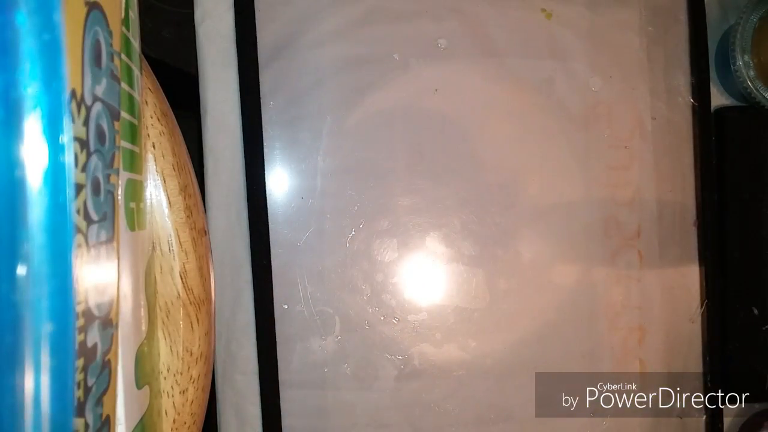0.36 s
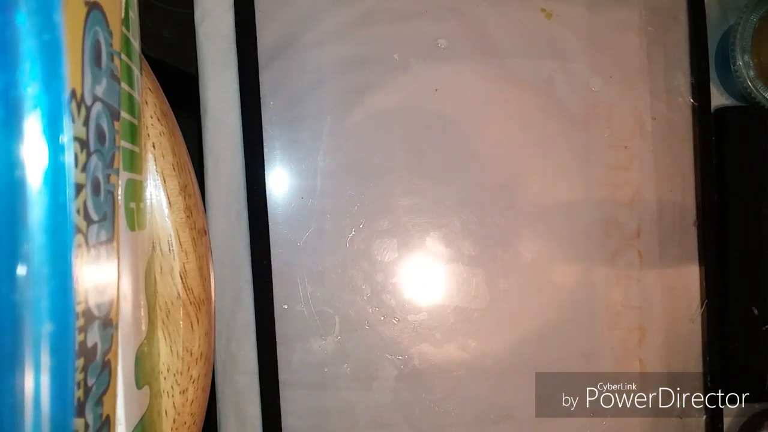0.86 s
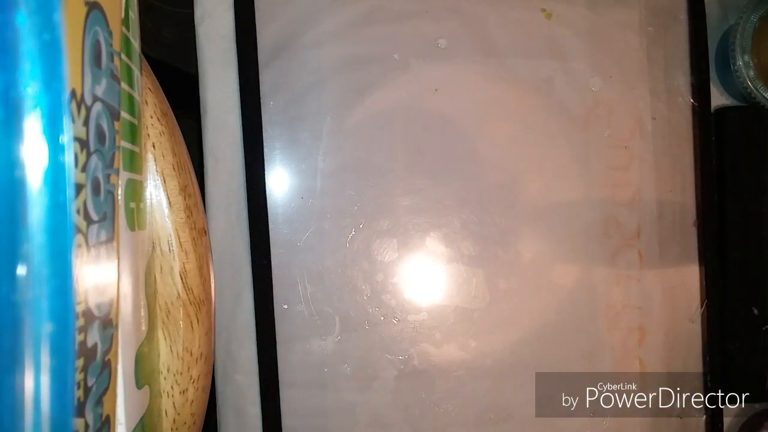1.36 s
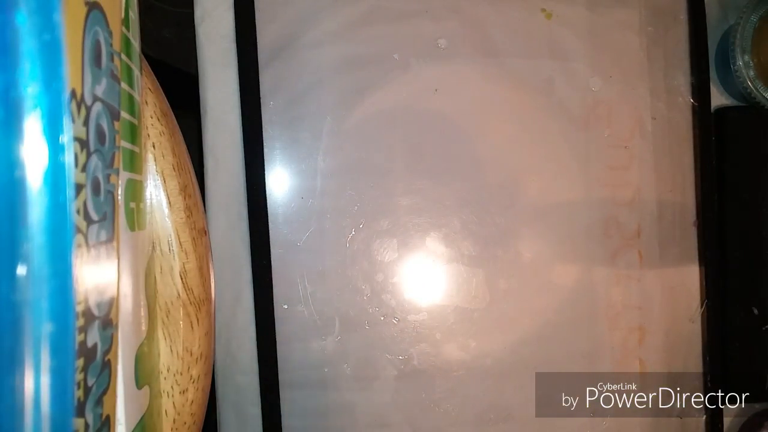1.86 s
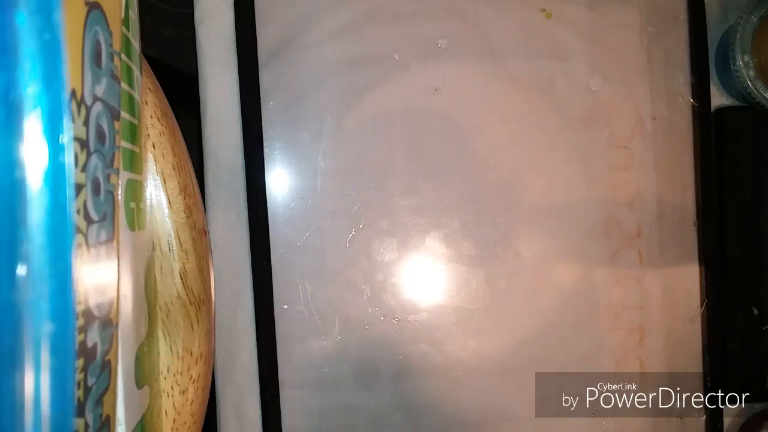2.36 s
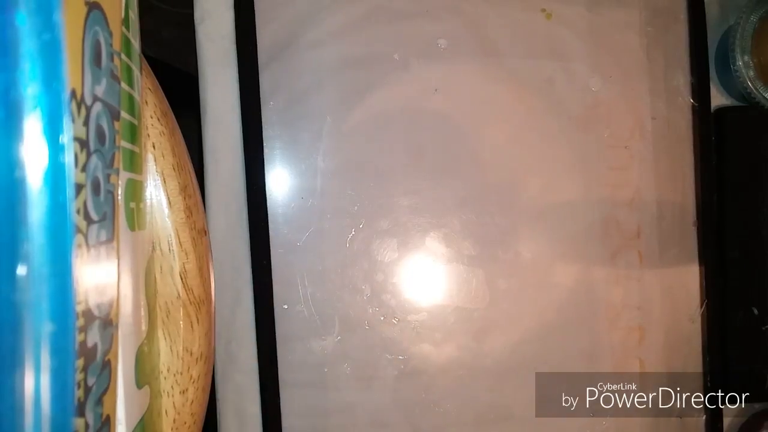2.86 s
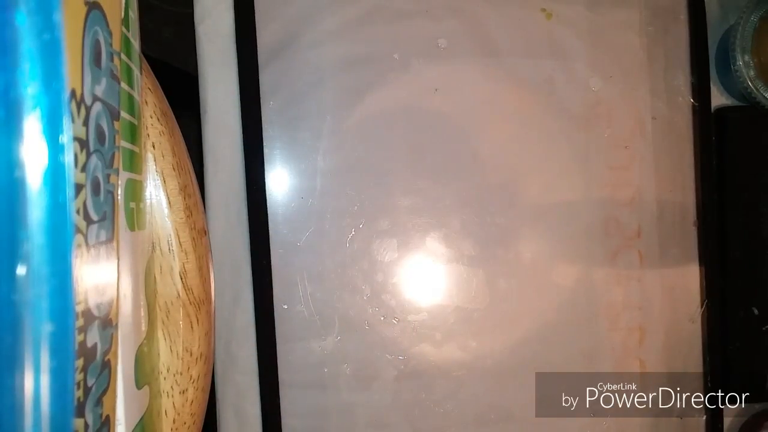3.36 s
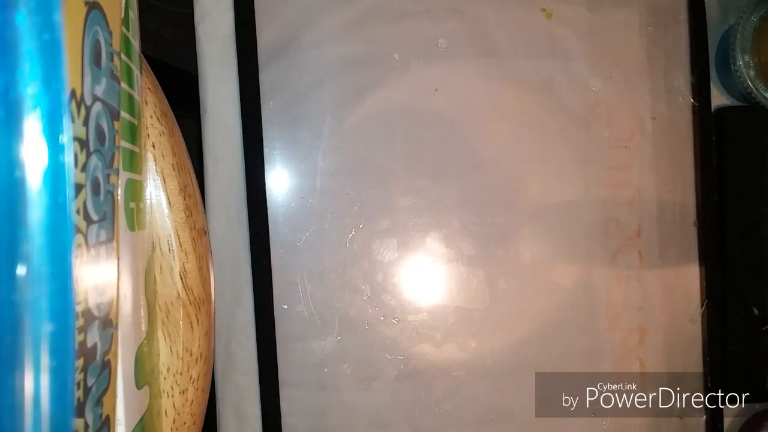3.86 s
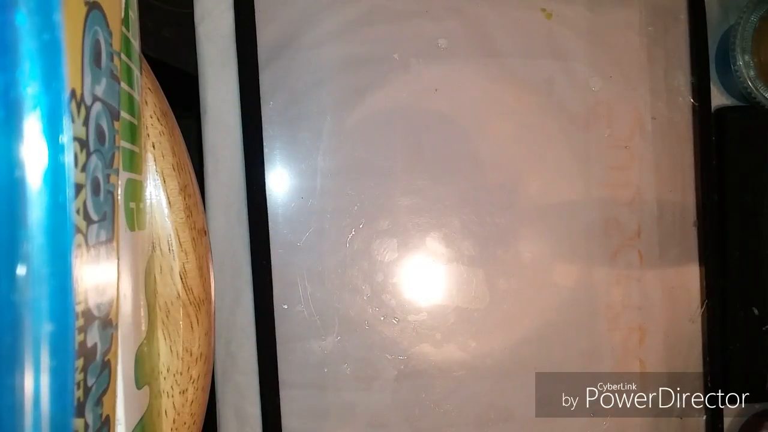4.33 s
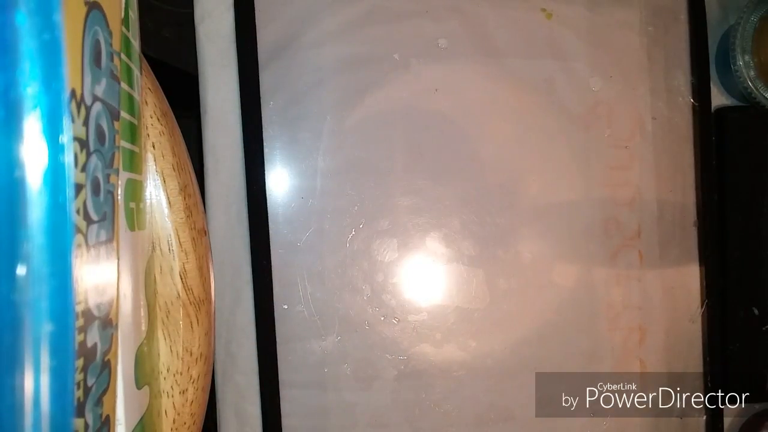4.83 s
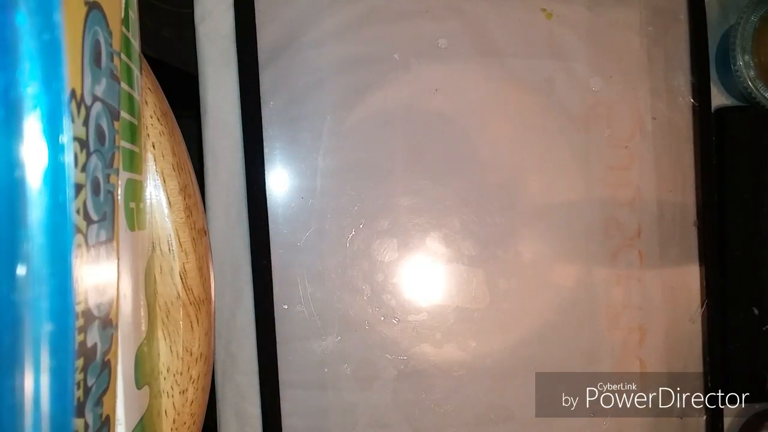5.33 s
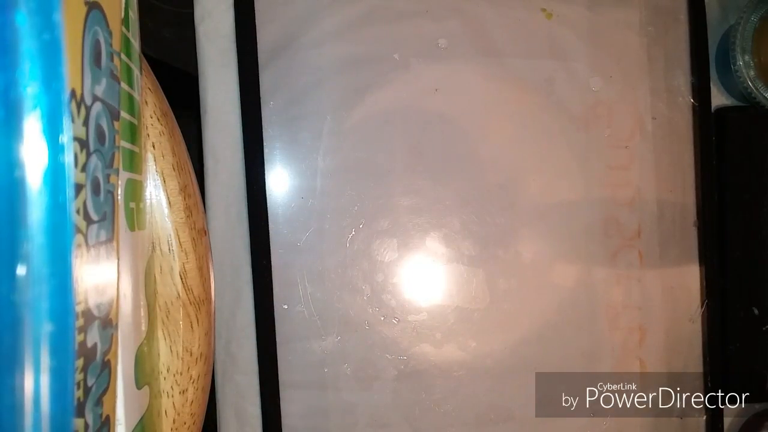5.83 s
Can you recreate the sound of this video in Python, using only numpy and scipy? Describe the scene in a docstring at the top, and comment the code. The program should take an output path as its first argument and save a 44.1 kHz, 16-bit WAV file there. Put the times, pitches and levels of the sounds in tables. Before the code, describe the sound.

A small, fairly dry room with soft room tone and a low, wavering engine drone from outside, its pitch easing down slightly while road noise fades. Close to the right microphone, a thin plastic sheet moves: light rustles at 0.2 and 0.5 seconds, a crisp click at 0.6, then bright snaps from 0.8. At 0.9 a sharp knock jolts the right side with a low push and a very brief high ring. A strong crack comes at 1.24, followed by two short rough squeaks of sticky slime near 1.35 and a fainter one at 1.5. From 1.6 to 2.3 the crinkling is densest and loudest, with sharp ticks over sliding hiss. After that only sparse, quieter rustles and small ticks remain, around 2.9, 3.2 and 3.8. At about 4.35 to 4.45 a soft, heavy distant thud rebounds with slight clatter. Faint crinkles continue near 4.8 to 5.1, dwindling towards 5.8.

```python
"""A small room, a thin plastic sheet crumpled and peeled off soft slime close to the right port of a microphone pair.
Creases flip with ticks and ringing noise, strokes rustle as grains over a sliding hiss, sticky slime squeaks.
One jolt pushes the right diaphragm and rings its port; later a heavy thud further off rings floor modes.
Outside an engine, a set of shaft orders over road noise, slows and draws away; room tone lies under it all."""
import sys
import numpy as np
from scipy import signal
from scipy.io import wavfile
from scipy.ndimage import uniform_filter1d

SR = 44100
rng = np.random.default_rng(int(sys.argv[2]) if len(sys.argv) > 2 else 0)


def file_out(sig):
    """Save sig as 16-bit WAV at sys.argv[1]."""
    # one column per channel
    cols = np.atleast_2d(sig).T
    # limit, then scale
    lim = np.clip(cols, -1, 1)
    pcm = np.round(lim * 32767).astype(np.int16)
    wavfile.write(sys.argv[1], SR, pcm)


def field_ratio(decibels):
    """Amplitude ratio for a level in dB (20 dB per decade); scalars and array-likes work."""
    return 10 ** (np.asarray(decibels, dtype=float) / 20)


N = 262703
LAG = 16  # samples by which near sounds reach the left port later

# Treble colour of the crisp sheet. Each row: frequency in Hz, relative density in dB per Hz.
FIZZ = [(2400, -42), (4000, -9.5), (6000, -4), (9300, 0), (11000, -2.5), (15000, 4)]


def evened(x):
    """Scales to rms 1."""
    return x / np.sqrt(np.mean(x ** 2) + 1e-20)


def read(points, hz):
    """Reads a table on a log-frequency axis."""
    f, value = np.transpose(points)
    return np.interp(np.log(hz + 1), np.log(f + 1), value)


def coloured(x, colour):
    """Causal minimum-phase filter of unit energy with the given spectrum."""
    hz = abs(np.fft.fftfreq(4096, 1 / SR))
    log_gain = np.log(field_ratio(np.maximum(read(colour, hz), -100)))
    taps = np.fft.ifft(np.exp(np.conj(signal.hilbert(log_gain)))).real[:2048]
    taps = taps / np.linalg.norm(taps)
    return signal.oaconvolve(x, taps[None], axes=1)[:, :N]


def sides(pan_db):
    """Left and right gains, summing to 2, for a left-right difference."""
    return np.array([field_ratio(pan_db / 2), field_ratio(-pan_db / 2)]) / np.cosh(pan_db / 40 * np.log(10))


def held(start, hold, db, rise_db_per_s, fall_db_per_s):
    """Coarse gain, one value every 32 samples, that climbs to db, holds, and falls away."""
    t = np.arange(0, N, 32) / SR
    rise_db = rise_db_per_s * np.maximum(start - t, 0)
    fall_db = fall_db_per_s * np.maximum(t - start - hold, 0)
    return field_ratio(np.maximum(db - rise_db - fall_db, -200))


def smooth(gain):
    """Spreads a coarse gain to every sample."""
    return np.interp(np.arange(N), np.arange(0, N, 32), gain)


def diffuse(colour, patchy_db):
    """Patchy noise of rms 1 from all round, alike at both ports only in the bass."""
    # Likeness of the two ports. Each row: frequency in Hz, share in common from 0 to 1.
    likeness = [(60, 0.88), (130, 0.66), (300, 0.37), (700, 0.25), (1400, 0)]
    # Balance of the two ports. Each row: frequency in Hz, left-right difference in dB.
    balance = [(60, -11), (300, -2), (1300, -2), (4400, 1.5), (15000, -10)]
    frames, hz = N // 256 + 5, np.fft.rfftfreq(1024, 1 / SR)
    a, b, c, d, patches = rng.standard_normal((frames, 513, 5)).T
    patches = uniform_filter1d(patches, 10, 0)  # over frequency
    patches = evened(uniform_filter1d(patches, 14, 1))  # over time
    same = np.clip(read(likeness, hz), 0, 1)[:, None]
    left = a + 1j * b
    right = same * left + np.sqrt(1 - same ** 2) * (c + 1j * d)
    gain = field_ratio(read(colour, hz)[:, None] + patchy_db * patches)
    z = np.array([left, right]) * gain * sides(read(balance, hz))[..., None]
    return evened(signal.istft(z, nperseg=1024, noverlap=768)[1][:, :N])


def room_tone():
    """Steady diffuse noise of the room and hiss."""
    # Colour of room tone and hiss. Each row: frequency in Hz, relative density in dB per Hz.
    air = [(20, -32), (127, -4), (260, -13), (500, -19.5), (850, -33.5), (1330, -24), (1800, -28),
           (2500, -27.5), (3000, -36.5), (5000, -36.5), (12500, -35), (14700, -30), (16000, -33)]
    return field_ratio(-61.5) * diffuse(air, 1)


def engine():
    """Shaft orders that waver on their way through the wall, over the fading road noise."""
    # Engine speed. Each row: time in seconds, shaft frequency in Hz.
    speed = [(0, 33.83), (.35, 33.31), (.7, 32.73), (1.0, 32.53), (2.0, 32.26), (3.4, 31.84), (5.0, 31.55),
             (5.95, 31.8)]
    # Orders fading with distance. Each row: order, relative level in dB at the start, fade in dB per s.
    orders = [(2, -70, 2), (3, -60.5, 2.5), (4, -57, 0.54), (6, -73, 1), (7, -62.5, 1.5), (9, -70, 5.5)]
    # Orders that swell for a while. Each row: order, start in seconds, hold in seconds, relative level in dB.
    swells = [(7, 0, 0.34, -50.5), (3, 0, .5, -59), (6, 0.94, 0.22, -56.5), (4, 2.5, 0.67, -53),
              (4, 3, 0.5, -53), (6, 3, 0.68, -63)]
    # Rumble and tyre roar. Each row: frequency in Hz, relative density in dB per Hz.
    road_colour = [(20, -38), (90, -11.5), (200, -2.5), (500, -20.5), (1070, -17), (1800, -25.5),
                   (3000, -45)]
    # Hollow band of tyre roar. Each row: frequency in Hz, relative density in dB per Hz.
    tyre_colour = [(500, -36), (800, -11), (1070, 6), (1350, -6), (1900, -42)]
    t = np.arange(N) / SR
    turn = 2 * np.pi * np.cumsum(np.interp(t, *np.transpose(speed))) / SR
    hum = 0
    for order, db, fade_db in orders:
        level = field_ratio(db - fade_db * t)
        for swelling, start, hold, swell_db in swells:
            if swelling == order:
                level = np.maximum(level, smooth(held(start, hold, swell_db, 39.5, 39.5)))
        slow = rng.standard_normal((2, 80))
        level_wobble, phase_wobble = [evened(np.interp(np.arange(N), np.arange(80) * N / 79, w)) for w in slow]
        level = np.sqrt(2) * level * field_ratio(0.67 * level_wobble)
        hum = hum + level * np.sin(order * turn + 0.15 * phase_wobble)
    road = field_ratio(-56.5 - 4 * t) * diffuse(road_colour, 0.8)
    tyres = field_ratio(-64.5 - 21 * np.maximum(t - 0.33, 0)) * diffuse(tyre_colour, 1.5)
    return hum * sides(-3.5)[:, None] + road + tyres


def thud():
    """A soft heavy blow and its rebounds ring the floor; the clatter follows from the walls."""
    # The far blow and its rebounds. Each row: time in seconds, relative level in dB.
    hits = [(4.346, -23), (4.382, -22), (4.398, -19.5), (4.442, -37), (4.464, -35.5)]
    # Floor modes. Each row: frequency in Hz, relative level in dB, t60 in seconds.
    modes = [(65.7, -31.5, 0.7), (96.5, -9.5, 0.36), (146.7, 7, 0.1), (157.3, 1, 0.23), (194.5, -17, 0.15),
             (285.4, -20, 0.29), (416, -21, 0.12), (472, -49, 0.44)]
    # Clatter. Each row: frequency in Hz, relative density in dB per Hz.
    clatter_colour = [(150, -30.5), (400, -1), (650, -11.5), (1000, -14), (1600, -11.5), (2500, -20.5),
                      (4000, -31.5), (6000, -39.5), (7500, -58)]
    blows, t = np.zeros(N), np.arange(SR // 2) / SR
    for s, db in hits:
        blows[round(s * SR)] = field_ratio(db)
    ring = sum(field_ratio(db - 60 * t / t60) * np.sin(2 * np.pi * hz * t) for hz, db, t60 in modes)
    ring *= np.sin(np.pi / 2 * np.minimum(t / 0.011, 1)) ** 2  # soft onset
    clatter = smooth(held(4.38, 0.046, -42, 602, 217)) * diffuse(clatter_colour, 3)
    return signal.oaconvolve(blows, ring)[:N] * sides(-4)[:, None] + clatter


def jolt():
    """The right diaphragm is pushed in and swings back slowly; the air in its port rings briefly."""
    # The casing knocked at the right port. One row: time in seconds, relative push level in dB,
    # push frequency in Hz, relative port ring level in dB, port frequency in Hz.
    knock = (.8972, -14, 380, -8, 9100)
    s, push_db, push_hz, ring_db, port_hz = knock
    t = np.maximum(np.arange(N) / SR - s + 0.00017, 0)
    u = t * 2 * np.pi * push_hz
    swing_back = 0.37 * (u / 7) ** 2 * np.exp(2 - 2 * u / 7)
    push = -field_ratio(push_db) * (u * np.exp(1 - u) - swing_back)
    ring = field_ratio(ring_db - 60 * t / 0.004) + field_ratio(ring_db - 18 - 60 * t / 0.012)
    right = push + ring * np.sin(2 * np.pi * port_hz * t)
    return np.array([0.025 * right, right])


def squeaks():
    """Sticking slime gives short rough whistles with a faint octave, the same at both ports."""
    # Slime sticking. Each row: start in seconds, level in dB, mean pitch in Hz, t60 in seconds.
    sticks = [(1.351, -41, 2025, 0.075), (1.372, -43, 2024, 0.071), (1.523, -51, 2046, 0.029)]
    out, t = np.zeros(N), np.arange(SR // 5) / SR
    for s, db, hz, t60 in sticks:
        rough = uniform_filter1d(rng.standard_normal(len(t)), 150)
        turn = 2 * np.pi * np.cumsum(hz * (1 + 0.15 * rough)) / SR
        level = field_ratio(db - 60 * t / t60) * np.minimum(t / 0.0012, 1)
        out[round(s * SR):][:len(t)] += level * (np.sin(turn) + 0.1 * np.sin(2 * turn))
    return out


def rustle(per_s=700, spread_db=2.5):
    """Tiny creases, a few large, over a sliding hiss; the casing shades the left port more in the treble."""
    # The sheet sliding and flexing. Each row: start in seconds, hold in seconds,
    # relative fizz level in dB, relative slide level in dB.
    strokes = [(0.222, 0.051, -60, -68), (0.524, .1, -53, -58), (0.69, 0.15, -68, -72),
               (0.91, 0.029, -41, -56), (0.98, .07, -55, -70.5), (1.082, 0.037, -49, -50.5),
               (1.148, 0.086, -56.5, -58.5), (1.31, 0.022, -55, -57), (1.423, 0.026, -61, -69),
               (1.62, .11, -46, -49.5), (1.759, .02, -39, -56), (1.813, 0.065, -48, -57),
               (1.961, 0.053, -47.5, -51), (2.059, 0.019, -49, -54), (2.272, 0.032, -51.5, -57),
               (2.299, 0.035, -47.5, -50), (2.655, 0.028, -61.5, -71), (2.836, 0.011, -63, -63.5),
               (2.88, 0.063, -58, -67), (3.158, 0.094, -56.5, -62.5), (3.349, 0.023, -61, -63),
               (3.685, .05, -66, -85), (3.768, 0.078, -55.5, -61.5), (3.94, 0.041, -63.5, -72),
               (4.158, 0.082, -64, -67.5), (4.671, .03, -62.5, -69.5), (4.759, 0.031, -54.5, -65.5),
               (4.956, 0.048, -52.5, -61.5), (5.02, 0.11, -59.5, -66.5), (5.356, 0.088, -63, -67.5),
               (5.52, 0.016, -70.5, -69.5), (5.775, 0.018, -70, -76)]
    # Sliding hiss. Each row: frequency in Hz, relative density in dB per Hz.
    slide = [(350, -30), (800, -3.5), (1500, -0.5), (2800, -3.5), (5000, -7.5), (8000, -26)]
    sizes = field_ratio(spread_db * np.minimum(rng.exponential(1, N), 5))
    grains = sizes * (rng.random(N) < per_s / SR)
    gate = evened(signal.lfilter([1], [1, -np.exp(-1 / (0.0012 * SR))], grains))  # 1.2 ms decay
    out = 0
    # steady: the even hiss beneath the grains
    for k, (colour, pan_db, steady) in enumerate([(FIZZ, -8, 0.6), (slide, -4, 1.6)]):
        power = sum(held(s, hold, db[k], 284, 226) ** 2 for s, hold, *db in strokes)
        near, other = rng.standard_normal((2, N)) * evened(gate + steady)
        pair = evened(np.array([0.23 * np.roll(near, LAG) + 1.13 * other, near]))
        out = out + coloured(pair * smooth(np.sqrt(power)) * sides(pan_db)[:, None], colour)
    return out


def snaps(strain_s=0.0008):
    """Each crease strains, flips with a sharp tick and a few aftershocks, then the panels around it ring on."""
    # Creases snapping. Each row: start in seconds, relative crack level in dB (1.5-5 kHz), relative body
    # level in dB (under 1.5 kHz), relative fizz level in dB (over 7 kHz), left-right dB before shading.
    creases = [(0.5852, -40.5, -33.5, -41.5, -5.5), (0.8293, -44.5, -58, -25, -17),
               (0.9066, -44, -58, -30, -2), (0.9129, -57.5, -56, -26.5, -2),
               (0.9648, -53.5, -61, -33.5, -22), (0.977, -59, -56, -40, 7), (1.2277, -47, -30.5, -57, -7),
               (1.239, -29, -37, -30.5, -5.5), (1.408, -53.5, -52.5, -41, -10), (1.4434, -60, -56, -48, -9),
               (1.4636, -62, -79.5, -41.5, -2.5), (1.579, -59, -56, -47.5, -13),
               (1.6412, -55, -48, -35.5, -20), (1.657, -61, -49, -37, -12), (1.675, -40, -49, -29, -10),
               (1.6869, -27.5, -43, -20.5, -10), (1.701, -24.5, -26, -22, -3), (1.7476, -52, -33, -44, -5),
               (1.7851, -53.5, -75, -36.5, -20), (1.829, -35, -46, -24, -7.5),
               (1.8348, -28.5, -44.5, -23.5, -3), (1.958, -48, -62, -44, -11),
               (1.9916, -40, -48, -30.5, -16), (2.008, -42.5, -55, -30.5, 3), (2.039, -61, -75, -44, -5),
               (2.0571, -34, -45, -24.5, -9), (2.0799, -35, -58, -26, 0), (2.1329, -57, -82, -38, -3),
               (2.156, -47, -76, -33.5, -4), (2.3097, -44, -48, -42, -14), (2.832, -62.5, -49, -51.5, -4),
               (2.8826, -66, -62, -50, -19), (2.9327, -70, -75, -50.5, -10), (3.2165, -63, -53, -49, -22),
               (3.3013, -53.5, -46.5, -52, -5), (3.7642, -55, -36, -49.5, -6), (4.898, -74, -79, -54, -2),
               (4.944, -71, -75, -49, 1), (5.0586, -67, -67, -51, 5), (5.438, -75, -73, -54, -5),
               (5.51, -66, -54.5, -47.5, 2)]
    # Crack colour. Each row: frequency in Hz, relative density in dB per Hz.
    crack = [(900, -23), (1600, 1), (2600, 3), (4000, 1), (6000, -10.5), (9000, -43)]
    # Body colour. Each row: frequency in Hz, relative density in dB per Hz.
    body = [(200, -53), (450, -3.5), (900, -0.5), (1400, -7.5), (2500, -31.5)]
    t, out = np.arange(2000) / SR, np.zeros((3, 2, N))
    strain, after = np.minimum(t / strain_s, 1) ** 3, np.maximum(t - strain_s, 0)
    for s, *ring_db, pan_db in creases:
        # thin bright creases, with more fizz than body, flip harder
        tick_db = -2 + 0.43 * (ring_db[2] - ring_db[1])
        near, round_casing = rng.standard_normal((2, 3, len(t)))
        aftershocks = (rng.random(len(t)) < 0.04) * near[0]
        flip = aftershocks * field_ratio(-60 * after / 0.012) * (after > 0)
        flip[round(strain_s * SR)] = 1
        left, right = sides(pan_db)
        at = round(s * SR)
        # crack, body, fizz: tick gain in dB, ring t60 in seconds
        for k, (tick_gain_db, t60) in enumerate([(1.1, 0.03), (11.5, 0.017), (5.8, 0.032)]):
            level = field_ratio(ring_db[k])
            tick = field_ratio(tick_db + tick_gain_db) * flip
            ring = strain * field_ratio(2.5 - 60 * after / t60)
            out[k, 1, at:at + len(t)] += level * right * (tick + ring * near[k])
            shaded = 0.14 * tick + ring * (0.14 * near[k] + 0.63 * round_casing[k])
            out[k, 0, at + LAG:at + LAG + len(t)] += level * left * shaded
    return sum(coloured(x, colour) for x, colour in zip(out, (crack, body, FIZZ)))


def room(x):
    """Reverberation as sparse taps of random sign, each band dying at its own speed."""
    # Decay of the room. Each row: frequency in Hz, t60 in seconds.
    decay = [(500, 0.25), (2000, 0.28), (8000, 0.26), (15000, 0.13)]
    taps = np.zeros((2, SR // 2))
    at = np.arange(200, SR // 2 - 20, 20) + rng.integers(0, 20, (2, (SR // 2 - 201) // 20))
    np.put_along_axis(taps, at, rng.choice([-1., 1.], at.shape), 1)
    hz, t, z = signal.stft(taps, SR, nperseg=256)
    tail = signal.istft(z * field_ratio(-60 * t / read(decay, hz)[:, None]), SR, nperseg=256)[1]
    return signal.fftconvolve(x[None], tail / np.linalg.norm(tail[0]), axes=1)[:, :N]


def scene():
    """Room tone, far engine and thud, then the near sheet and slime with their room."""
    background = room_tone() + engine() + thud()
    knock = jolt()
    near = squeaks() + snaps()
    # only the bright part of the knock travels by air
    airborne = near[1] + 0.92 * np.diff(knock[1], prepend=0)
    echo = field_ratio(-11) * room(airborne) * sides(-0.514)[:, None]
    return background + knock + rustle() + near + echo


def roll_off(x):
    """The treble ends steeply here."""
    return signal.sosfilt(signal.butter(12, 16650, fs=SR, output="sos"), x)


def record(dry):
    """The microphone path passes nothing much above 15.7 kHz."""
    edge = signal.firwin(255, 15700, window=("kaiser", 7), fs=SR)
    mix = signal.oaconvolve(dry, edge[None], "same")
    return roll_off(mix)


dry = scene()
out = record(dry)
file_out(out)
```